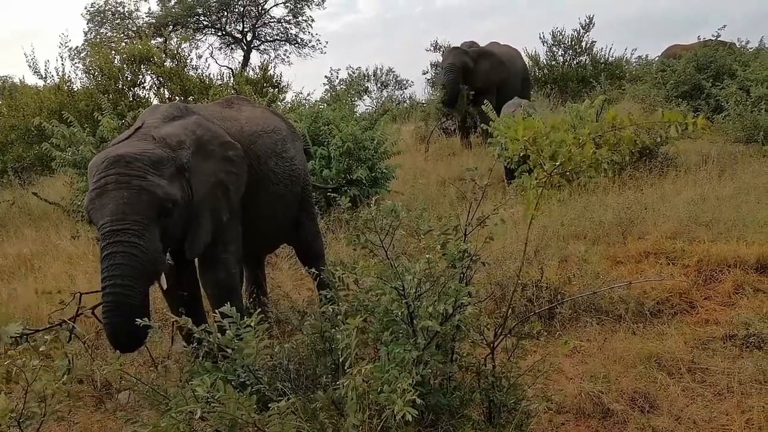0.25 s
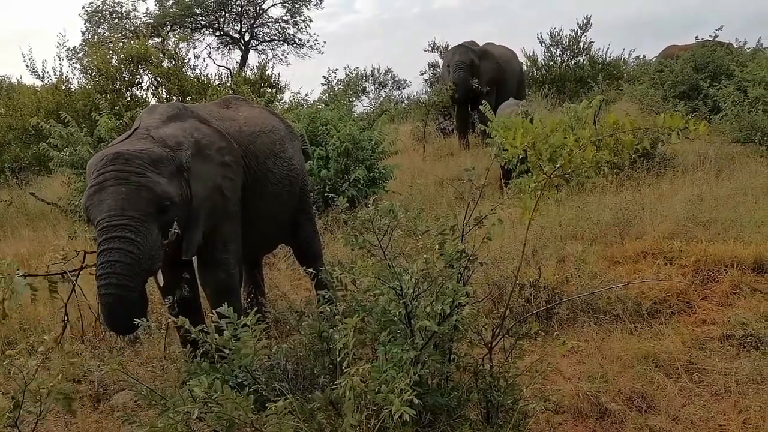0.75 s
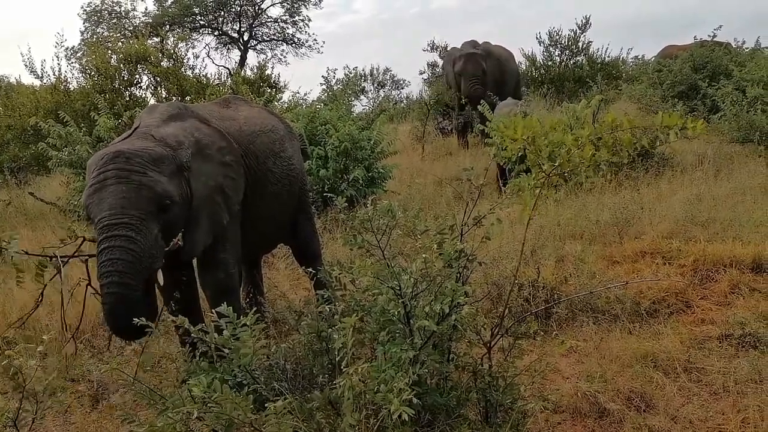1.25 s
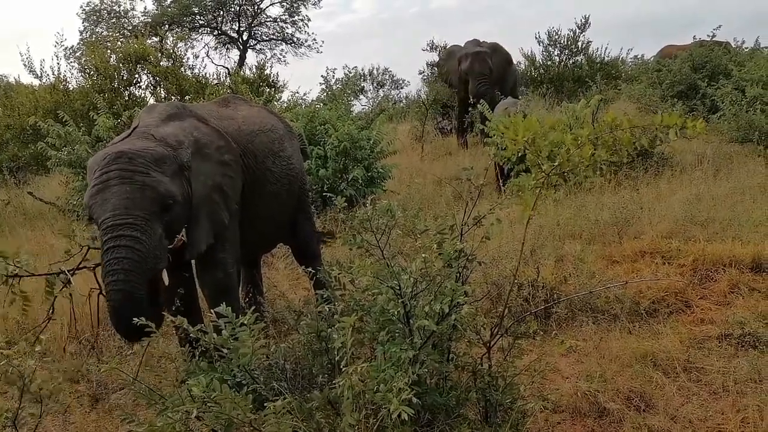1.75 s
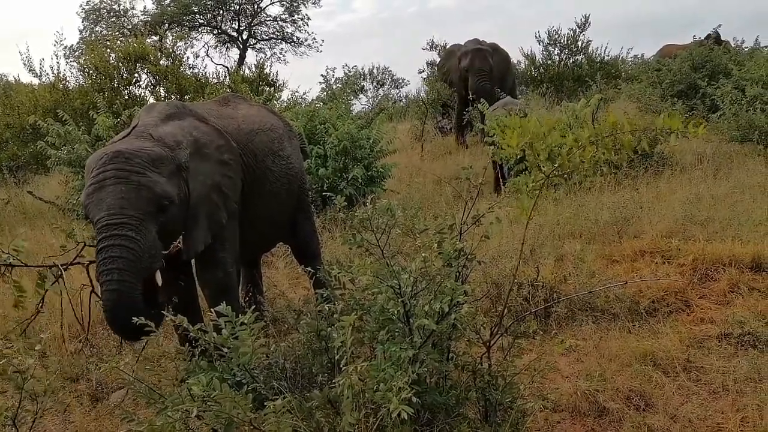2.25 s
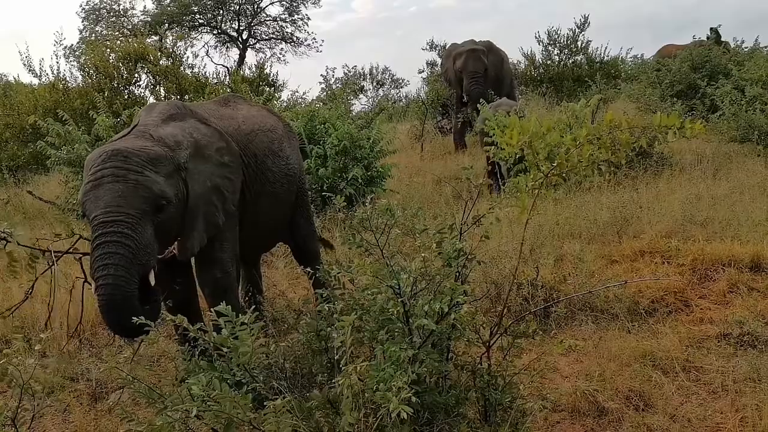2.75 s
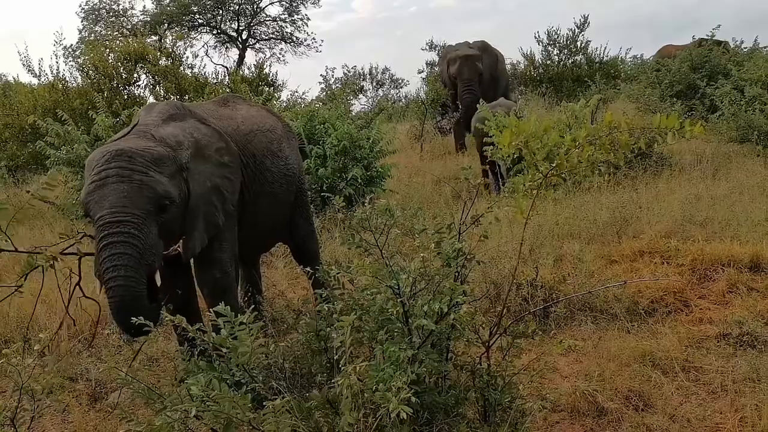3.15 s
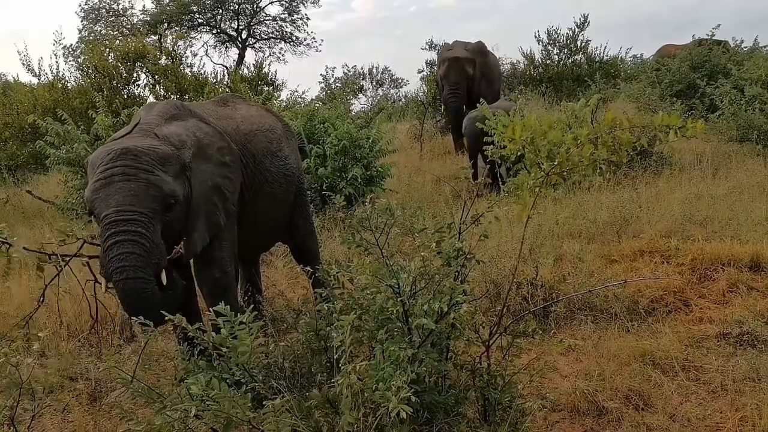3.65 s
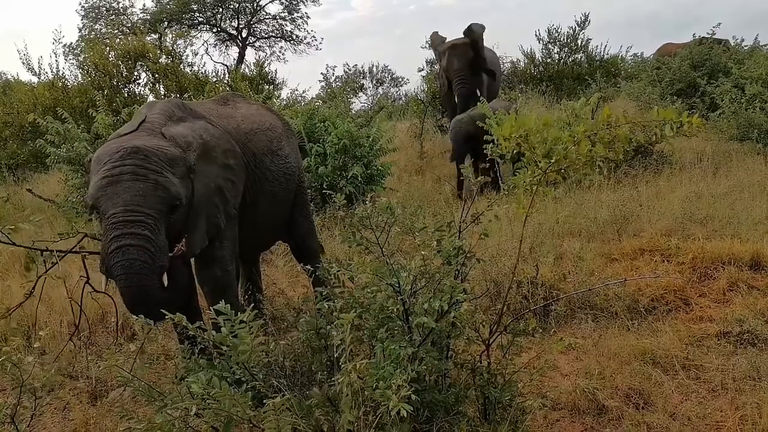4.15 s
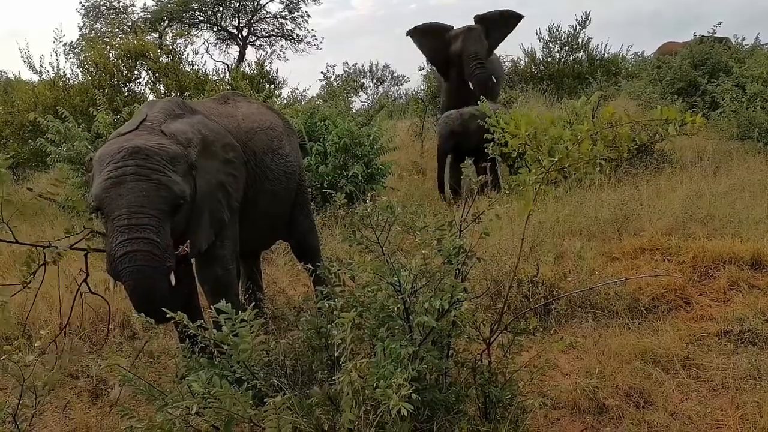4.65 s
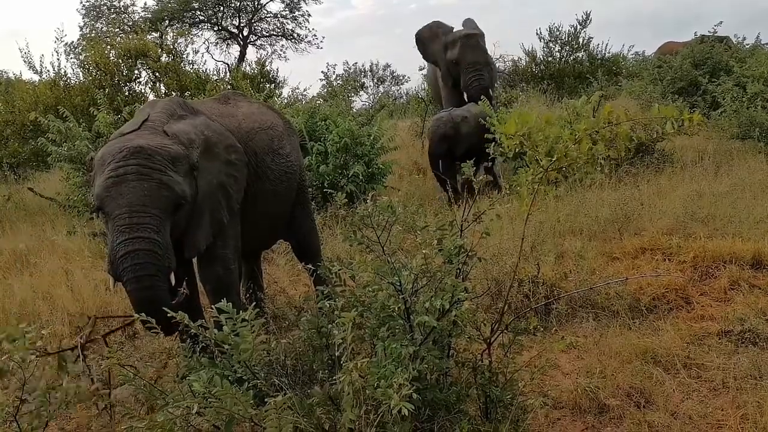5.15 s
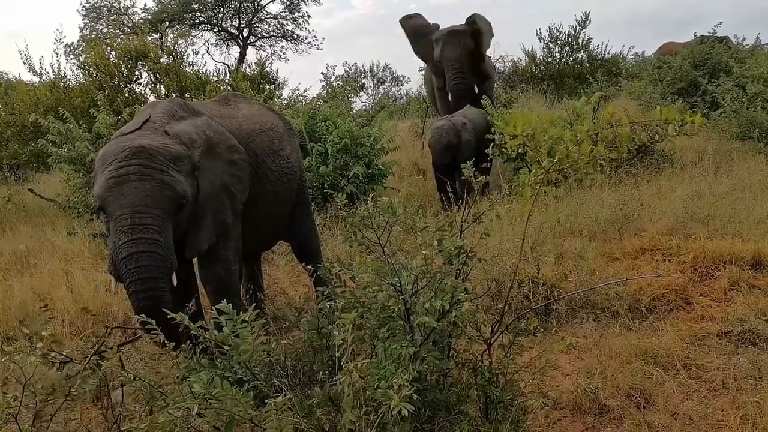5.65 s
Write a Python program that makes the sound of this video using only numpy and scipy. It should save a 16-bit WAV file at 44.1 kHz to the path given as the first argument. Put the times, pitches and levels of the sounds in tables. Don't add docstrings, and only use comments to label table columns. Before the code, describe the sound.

Dry leaves crackle and twigs break under feeding elephants, with wind thumps on the left, insects, low hum and a bird growing louder.

```python
import sys
import numpy as np
from scipy import signal
from scipy.fft import rfft, irfft
from scipy.io import wavfile

SR = 44100
rng = np.random.default_rng(int(sys.argv[2]) if len(sys.argv) > 2 else 0)


def inscribe(sig):
    pcm = np.round(np.clip(np.atleast_2d(sig).T, -1, 1) * 32767)
    wavfile.write(sys.argv[1], SR, pcm.astype(np.int16))


def makeup_ratio(level_db):
    decades = np.asarray(level_db, float) / 20
    return 10 ** decades


N = 260631
LEFT_LAG = -20


def rms_one(x):
    return x / np.sqrt(np.mean(x ** 2) + 1e-20)


def in_time(rows):
    s, *columns = np.transpose(rows)
    return [np.interp(np.arange(N) / SR, s, c) for c in columns]


def drift(rate):
    r = np.exp(-80 * np.pi * rate / SR)
    noise = rng.standard_normal(N // 40 + 2002)
    slow = signal.lfilter([1], [1, -2 * r, r * r], noise)[2000:]
    return np.interp(np.arange(N) / 40, np.arange(len(slow)), rms_one(slow))


def resonance(x, hz, width):
    r = np.exp(-np.pi * width / SR)
    top = [(1 - r * r) / 2, 0, (r * r - 1) / 2]
    bottom = [1, -2 * r * np.cos(2 * np.pi * hz / SR), r * r]
    return signal.lfilter(top, bottom, x + 1e-18)


def first_order(x, hz, kind):
    return signal.sosfilt(signal.butter(1, hz, kind, fs=SR, output="sos"), x)


def colour(x, points):
    hz = np.maximum(np.arange(2049) * SR / 4096, 1)
    point_hz, point_db = np.array(points).T
    response_db = np.interp(np.log(hz), np.log(point_hz), point_db)
    cepstrum = np.fft.irfft(np.log(makeup_ratio(response_db)))
    cepstrum[1:2048] *= 2
    cepstrum[2049:] = 0
    return signal.oaconvolve(x, irfft(np.exp(rfft(cepstrum))))[:N]


def add(track, s, sound):
    i = round(s * SR)
    track[i:i + len(sound)] += sound[:N - i]


def bush(x, scatter_db, t60, left_db=0.0, lag=LEFT_LAG, gap_s=0.0024):
    t = np.arange(9000) / SR
    scatter = rng.standard_normal((2, len(t))) * makeup_ratio(-60 * t / t60) * (t > gap_s)
    scatter = first_order(scatter, 700, "high")
    scatter = makeup_ratio(scatter_db) * scatter / np.linalg.norm(scatter[0])
    direct = np.array([makeup_ratio(left_db) * np.roll(x, lag), x])
    return direct + signal.oaconvolve(x[None], scatter, axes=1)[:, :N]


def spread(near, other, alike, lag):
    alike = np.clip(alike, 0, 1)
    left = alike * np.roll(near, round(lag)) + np.sqrt(1 - alike ** 2) * other
    return np.array([left, near])


def air():
    # f/Hz, level/dB per Hz
    air_tone = [(30, 30.5), (70, 30), (150, 13), (300, 18), (600, 7), (1000, 7.5), (1800, -16), (3000, 1),
                (6000, -8), (11600, 4), (12200, -8)]
    # f/Hz, width/Hz, first level/dB, last level/dB
    hum_bands = [(74.2, 7.7, -68.5, -62.5), (135, 16, -60, -63.5), (153.4, 28, -76.5, -61),
                 (233.4, 13.4, -79, -71.5)]
    # f/Hz, width/Hz, throbs/s, level/dB
    insects = [(7530, 150, 18, -67), (7360, 200, 20, -71), (4830, 500, 28, -75.5)]
    air_db = -67
    shared, *own = rng.standard_normal((3, N))
    own = np.array(own)
    bass = first_order(first_order(shared - own, 900, "low"), 60, "high")
    out = makeup_ratio(air_db + 0.52 * drift(0.33)) * np.array([colour(x, air_tone) for x in own + bass])
    for hz, width, *db in hum_bands:
        hum = resonance(resonance(shared + 0.7 * own, hz, width), hz, width)
        out += makeup_ratio(np.linspace(*db, N)) * rms_one(hum)
    for hz, width, per_s, db in insects:
        rate = per_s * makeup_ratio(0.5 * drift(3.8))
        throb = 1 + 0.062 * np.sin(2 * np.pi * np.cumsum(rate) / SR)
        level = makeup_ratio(db + 0.67 * drift(0.33))
        out += level * throb * rms_one(resonance(resonance(own, hz, width), hz, width))
    return out


def wind():
    # t/s, level/dB
    wind_level = [(0.0, -63), (0.57, -56), (0.67, -48.5), (0.84, -59.5), (1.3, -62.5), (1.55, -68.5),
                  (1.99, -52), (2.1, -62.5), (2.75, -74), (3.08, -60), (3.4, -61), (4.11, -64),
                  (4.3, -67.5), (4.56, -54.5), (4.91, -69.5), (5.23, -56.5), (5.55, -70.5), (5.91, -69.5)]
    # t/s, level/dB, fall time/ms
    buffets = [(0.03, -43, 4.5), (0.225, -45, 8.8), (1.079, -40, 3.6), (1.27, -45, 6.6), (1.47, -44, 4.4),
               (0.343, -41, 4.4), (0.614, -36.5, 6.7), (0.626, -32.5, 5.9), (0.643, -27, 3.54),
               (0.653, -32, 7), (0.666, -30, 2.8), (0.678, -43, 7.1), (0.686, -28, 3.1), (0.699, -42, 4.4),
               (0.704, -24.5, 2.42), (0.717, -37, 4.7), (0.744, -35.5, 3.6), (0.759, -40, 5.7),
               (0.793, -36.5, 3.9), (1.861, -38.5, 9.6), (1.891, -36, 3.9), (1.966, -36, 4.7),
               (3.111, -37, 6.5), (3.263, -37.5, 6.8), (3.697, -40.5, 3.1), (3.709, -27.5, 5.6),
               (3.721, -33, 3.8), (3.777, -32.5, 3.5), (4.368, -40, 4.5), (4.516, -38.5, 3.5),
               (4.563, -34.5, 3.2), (4.758, -40, 4.9), (5.142, -34.5, 5.3), (5.195, -41.5, 6.6),
               (5.23, -35.5, 5.4)]
    lumps = rng.standard_normal(N) * makeup_ratio(3.5 * drift(12))
    lumps = signal.sosfilt(signal.butter(2, [35, 120], "band", fs=SR, output="sos"), lumps)
    out = makeup_ratio(in_time(wind_level)[0] + 9.0) * rms_one(lumps)
    for s, db, fall_ms in buffets:
        u = np.arange(-0.03, 0.03, 1 / SR) / (fall_ms / 2000)
        add(out, s - 0.03, makeup_ratio(db + 7.5) * -u * np.exp(-u ** 2 / 2))
    return out


def far_calls():
    # start/s, length/s, first f/Hz, last f/Hz, level/dB
    calls = [(.335, .042, 2170, 2180, -50), (0, .05, 470, 480, -56), (.42, .075, 470, 460, -58),
             (.9, .018, 917, 900, -53), (1.003, .05, 352, 338, -56), (1.07, .125, 7400, 6980, -55),
             (1.268, .03, 3050, 2980, -54), (1.882, .095, 522, 480, -64), (2.11, .051, 1945, 1880, -63),
             (2.15, .044, 460, 395, -52), (2.4, .6, 133, 133, -57), (2.635, .05, 394, 388, -54),
             (2.645, .13, 7420, 7250, -54), (2.76, .09, 7200, 7000, -59), (2.465, .09, 6950, 6780, -58),
             (2.985, .16, 7120, 6960, -50), (3.375, .1, 3820, 3930, -59), (3.555, .09, 3870, 3930, -60),
             (3.665, .03, 3560, 3540, -63), (3.755, .055, 3910, 3800, -63), (3.8, .055, 3830, 3910, -61),
             (3.8, .068, 380, 389, -55), (3.96, .06, 3860, 3730, -60), (4.01, .07, 3730, 3840, -60),
             (4.47, .086, 7250, 7000, -60), (4.585, .033, 2760, 2800, -57), (4.8, .17, 7400, 6900, -59.5),
             (5.275, .04, 1600, 1570, -44), (5.28, .035, 1340, 1300, -47), (5.282, .034, 2290, 2320, -42)]
    out, waver_hz = np.zeros(N), 26 * drift(28)
    for s, length, first_hz, last_hz, db in calls:
        u = np.arange(0, length, 1 / SR) / length
        waver = np.sqrt(first_hz / 4000) * waver_hz[round(s * SR):][:len(u)]
        pitch = first_hz + (last_hz - first_hz) * u + waver
        add(out, s, makeup_ratio(db) * np.sin(np.pi * u) * np.sin(2 * np.pi * np.cumsum(pitch) / SR))
    return out * makeup_ratio(2.2 * drift(35) - 1.5)


def trill():
    # start/s, length/s, first f/Hz, last f/Hz, pulses/s
    s, length, first_hz, last_hz, per_s = (1.553, .28, 4350, 4720, 52.5)
    trill_db = -60.5
    t = np.arange(0, length, 1 / SR)
    pitch = first_hz + (last_hz - first_hz) * (t / length) ** 3
    pulses = np.sin(np.pi * per_s * t) ** 16
    out = np.zeros(N)
    add(out, s, makeup_ratio(trill_db) * pulses * np.sin(2 * np.pi * np.cumsum(pitch) / SR))
    return out


def near_bird():
    # start/s, length/s, middle f/Hz, peak level/dB
    notes_sung = [(0.915, 0.07, 2480, -63.5), (1.367, 0.076, 2530, -56.5), (1.46, 0.063, 2490, -65),
                  (1.816, 0.078, 2540, -58), (1.874, 0.052, 2515, -59), (2.232, 0.077, 2553, -48.5),
                  (2.345, 0.04, 2540, -61), (2.65, 0.076, 2543, -46), (2.761, 0.051, 2570, -54.5),
                  (3.075, 0.081, 2538, -43), (3.198, 0.046, 2550, -48.5), (3.492, 0.086, 2530, -44.5),
                  (3.612, 0.057, 2558, -47), (3.911, 0.091, 2530, -41.5), (4.032, 0.067, 2555, -43.5),
                  (4.351, 0.078, 2503, -42), (4.462, 0.061, 2500, -43), (4.768, 0.089, 2487, -39),
                  (4.894, 0.062, 2490, -40.5), (5.198, 0.089, 2535, -36.5), (5.324, 0.056, 2580, -42.5),
                  (5.609, 0.098, 2565, -39), (5.757, 0.056, 2506, -40.5)]
    note_shape = [(0, 0.082, 0.01), (.24, 0.055, 0.16), (.4, 0.0283, 0.75), (.65, -0.0063, 1.25),
                  (0.83, -.035, 1.2), (.92, -0.067, 0.64), (0.999, -0.11, 0.055)]
    share, shift, strength = np.transpose(note_shape)
    out = np.zeros(N)
    for s, length, hz, db in notes_sung:
        depth = np.clip(1.0 + 0.035 * (db + 40), 0.3, 1.02)
        u = np.arange(0, length, 1 / SR) / length
        pitch = hz * (1 + depth * np.interp(u, share, shift))
        whistle = np.sin(2 * np.pi * np.cumsum(pitch) / SR)
        add(out, s, makeup_ratio(db + 0.5) * np.interp(u, share, strength) * whistle)
    return out * makeup_ratio(1.5 * drift(60))


def ringing(rows, push_cycles, ring_cycles, lift_db):
    out, rough = np.zeros(N), rng.standard_normal((len(rows), 4000))
    for (s, hz, db), noise in zip(rows, rough):
        cycles = np.arange(4000) * hz / SR
        push = noise * np.sin(np.pi * np.minimum(cycles / push_cycles, 1))
        ring = resonance(resonance(push, hz, hz / ring_cycles), hz, 2 * hz / ring_cycles)
        start_s = s - np.argmax(abs(ring)) / SR
        add(out, max(start_s, 0), makeup_ratio(db + lift_db) * ring / abs(ring).max())
    return out


def quiet_leaf_snaps():
    # peak t/s, f/Hz, level/dB
    soft_snaps = [(0.687, 2890, -65), (0.707, 3448, -63), (0.894, 4877, -62), (0.914, 3072, -64),
                  (1.042, 2900, -66), (1.133, 2900, -68.4), (1.282, 3072, -55), (1.328, 3871, -63),
                  (1.329, 6870, -54), (1.348, 7307, -66.0), (1.537, 3255, -69.8), (1.95, 6510, -69.3),
                  (1.954, 2900, -70), (1.999, 4877, -63.2), (2.001, 2920, -62), (2.249, 3400, -67),
                  (2.438, 3470, -65), (2.579, 3448, -68), (2.607, 6230, -62), (2.794, 4877, -64),
                  (3.223, 6550, -61), (3.426, 5167, -59), (3.426, 6510, -56), (3.488, 3653, -65),
                  (3.627, 3950, -61), (3.681, 3470, -60.8), (4.021, 3871, -60), (4.041, 3670, -59),
                  (4.115, 2880, -63), (4.115, 4100, -64), (4.307, 4345, -62), (4.508, 3420, -61),
                  (4.603, 2880, -66), (4.673, 3430, -51), (4.963, 3850, -65), (4.967, 6930, -51),
                  (5.787, 4877, -45)]
    return ringing(soft_snaps, push_cycles=36, ring_cycles=22, lift_db=7.5)


def leaf_snaps():
    # peak t/s, f/Hz, level/dB
    snaps = [(0.022, 3370, -54), (0.044, 3330, -47), (0.045, 4877, -63), (0.045, 7600, -35),
             (0.076, 3480, -56), (0.094, 6510, -49), (0.096, 3700, -42.5), (0.111, 5160, -39),
             (0.116, 3653, -44), (0.116, 7400, -38), (0.135, 6460, -54.2), (0.197, 3448, -55),
             (0.197, 7500, -31.5), (0.227, 6850, -53.2), (0.228, 3255, -67), (0.229, 4877, -52),
             (0.349, 6510, -51), (0.357, 4850, -52), (0.369, 3050, -57.2), (0.419, 6870, -45),
             (0.42, 5120, -46), (0.439, 6897, -51.8), (0.453, 4960, -55.0), (0.458, 6840, -43),
             (5.14, 4300, -53), (5.168, 4345, -52), (5.17, 3300, -66), (5.178, 6460, -46),
             (5.209, 4560, -49), (5.212, 6100, -46), (5.233, 4300, -54.4), (5.236, 6560, -56.8),
             (5.272, 6897, -48), (5.274, 4310, -47), (5.295, 3800, -45), (5.33, 5000, -51),
             (5.349, 4900, -38), (5.379, 3610, -39.5), (5.391, 6050, -44), (5.367, 3370, -40),
             (5.423, 4890, -45), (5.441, 3290, -44), (5.446, 4830, -41), (5.465, 6200, -43),
             (5.468, 3214, -41), (5.486, 4877, -44), (5.5, 4900, -47), (5.503, 2510, -47),
             (5.516, 4877, -52), (5.523, 3240, -55), (5.55, 5167, -62), (5.384, 3800, -44),
             (5.573, 4870, -57), (5.601, 4870, -60), (5.609, 6570, -58), (5.616, 3653, -64),
             (5.63, 4603, -56), (5.654, 4877, -62)]
    return ringing(snaps, push_cycles=36, ring_cycles=22, lift_db=4.5)


def wood_knocks():
    # peak t/s, f/Hz, level/dB
    knocks = [(0.008, 450, -68), (0.044, 456, -56), (0.07, 475, -50), (0.07, 1120, -48.5),
              (0.086, 800, -46), (0.086, 1094, -59), (0.095, 1510, -52), (0.104, 807, -50.5),
              (0.12, 256, -54), (0.202, 340.7, -48), (0.205, 855, -53), (0.232, 776, -52),
              (0.247, 387, -48), (0.279, 340, -56), (0.313, 724, -54), (0.318, 1110, -52.5),
              (0.337, 689, -56), (0.34, 1032, -58), (0.346, 1480, -52), (0.367, 1030, -50),
              (5.295, 1570, -33), (5.327, 1547, -53), (5.348, 1530, -46), (5.35, 1228, -51),
              (5.374, 1600, -49), (5.391, 1320, -45), (5.392, 455, -54.7), (5.572, 897, -40),
              (5.432, 910, -52), (5.432, 1639, -46), (5.435, 273, -52), (5.436, 388, -50),
              (5.464, 293, -56), (5.48, 730, -55), (5.492, 1639, -52), (5.495, 1210, -45),
              (5.572, 1130, -42), (5.509, 354, -48), (5.515, 290, -50), (5.527, 1040, -52.0),
              (5.529, 725, -46.5), (5.535, 430, -40), (5.589, 684, -39), (5.596, 474, -40),
              (5.611, 360, -39.5), (5.615, 281, -48), (5.602, 1150, -42), (5.622, 830, -43),
              (5.624, 1146, -40.5), (5.641, 670, -48), (5.66, 386, -46), (5.662, 275, -54),
              (5.675, 1120, -55), (5.683, 494, -47), (5.729, 363, -45), (5.79, 650, -50),
              (5.79, 1100, -44.7), (5.866, 1030, -60)]
    return ringing(knocks, push_cycles=9, ring_cycles=9, lift_db=0.0)


def twigs():
    # t/s, peak level/dB, low mode f/Hz, low mode share/dB
    breaks = [(0.043, -29, 745, -21.5), (0.088, -32, 980, -13), (0.111, -27, 975, -24),
              (0.178, -29, 870, -28), (0.195, -31, 400, -36), (0.343, -33.5, 1030, -14.5),
              (0.455, -44, 470, -29), (0.919, -51, 850, 1), (0.998, -48, 490, -6), (2.518, -52, 483, -2.5),
              (2.641, -57, 574, 5.5), (3.893, -37.5, 610, -22), (4.149, -43, 820, -11.5),
              (4.205, -44.5, 750, -4.5), (4.334, -43, 800, -4), (4.508, -43, 610, -5),
              (4.671, -31.5, 1080, -15.5), (5.109, -50, 845, -14), (5.203, -40.5, 1220, -7.5),
              (5.27, -25.5, 1400, -19.5), (5.29, -35, 1360, -6), (5.43, -37, 412, -20),
              (5.505, -30.5, 496, -10), (5.785, -29, 1060, -11), (5.864, -37.5, 1060, -12)]
    t60_s, tear_ms = 0.028, 0.3
    out, t = np.zeros(N), np.arange(3000) / SR
    fibres = rng.standard_normal((len(breaks), len(t)))
    tearing = makeup_ratio(-60 * t / t60_s) * (1 - np.exp(-1000 * t / tear_ms))
    for (s, db, hz, thick_db), noise in zip(breaks, fibres):
        burst = noise * tearing + 5.0 * (t == 0)
        low = resonance(burst, hz, 0.32 * hz) - 0.45 * resonance(burst, 2.04 * hz, 0.8 * hz)
        high = resonance(burst, 3000, 1040) + 0.5 * resonance(burst, 6400, 3500)
        add(out, s, makeup_ratio(db - 2.0) * (high + makeup_ratio(thick_db + 18.5) * low))
    return out


def crackle(low_hz, high_hz, per_s, cycles, uneven_db, clump_db, patchy_db, count, tilt_db=0.0):
    draw, size, deal = rng.random((3, 2, N), dtype=np.float32)
    born = draw < per_s * makeup_ratio(clump_db * drift(18)) / SR
    sign = np.where(draw * 1e6 % 2 < 1, 1, -1)
    clicks = born * makeup_ratio(-uneven_db * np.log(size + 0.007)) * sign
    dealt = (deal * count).astype(int)
    out = 0
    for k, hz in enumerate(np.geomspace(low_hz, high_hz, num=count)):
        level = makeup_ratio(patchy_db * drift(11.0) + tilt_db * np.log2(hz / low_hz))
        out = out + level * resonance(clicks * (dealt == k), hz, 2.0 * hz / cycles)
    return rms_one(out)


def movements(rows, t, *steady_db):
    rise_share, fade_db = 0.64, 7.5
    power = makeup_ratio(np.array(steady_db)) ** 2
    for s, fade_s, *db in rows:
        away = np.where(t < s, (s - t) / rise_share, t - s) / max(fade_s, 0.004)
        power = power + makeup_ratio(np.array(db)[:, None] - fade_db * away) ** 2
    return in_time(np.transpose([t, *10 * np.log10(power)]))


def browsing():
    # t/s, effort as dry-leaf level/dB
    effort = [(0, -54.5), (0.3, -60.5), (0.54, -62), (0.9, -57.5), (1.07, -69), (1.51, -62.5),
              (1.83, -68.5), (2.19, -67.5), (2.4, -66.5), (2.63, -67), (2.9, -61.5), (3.24, -64),
              (3.6, -60), (3.75, -67), (4.46, -61), (4.6, -62.5), (5.12, -57), (5.91, -57.5)]
    # peak t/s, fading time/s, dry leaves/dB, brittle leaf tips/dB
    tugs = [(.05, 0.0053, -65, -57), (.093, 0.016, -47.5, -52), (.113, 0.017, -44.5, -57),
            (.2, 0.08, -51, -59.5), (.36, 0.072, -53, -63.5), (.45, 0.043, -52, -59.5),
            (.97, 0.13, -74, -73), (1.28, 0.052, -58.5, -88), (2.008, 0.018, -57, -83),
            (2.42, 0.15, -62, -74.5), (2.98, 0.012, -62, -70), (3.69, 0.083, -78, -68.5),
            (3.88, 0.15, -59, -69), (4.26, 0.18, -60, -63.5), (4.67, 0.056, -77, -75),
            (5.2, 0.068, -51, -69), (5.27, 0.022, -55, -87), (5.33, 0.038, -49.5, -87),
            (5.375, 0.11, -43.5, -82), (5.43, 0.052, -43.5, -55), (5.49, 0.03, -46, -55.5),
            (5.62, 0.036, -48.5, -70.5), (5.8, 0.018, -49.5, -69)]
    # peak t/s, fading time/s, heavy branch/dB, small stems/dB
    pulls = [(.01, 0.051, -57, -66), (.08, 0.032, -53.5, -58.5), (.2, 0.029, -50, -63.5),
             (.26, 0.025, -58, -84), (.34, 0.035, -81, -59), (.46, 0.011, -79, -65), (.71, 0.012, -68, -81),
             (1.02, 0.068, -60.5, -68), (1.51, 0.1, -60.5, -67), (2.63, 0.14, -58.5, -95),
             (3.83, 0.11, -69, -71), (4.2, 0.057, -56, -77), (4.67, 0.011, -53, -59),
             (5.2, 0.055, -58, -60), (5.27, 0.037, -76, -65), (5.33, 0.051, -56, -53.5),
             (5.41, 0.056, -52, -57), (5.43, 0.01, -41, -59), (5.5, 0.015, -53, -52),
             (5.54, 0.091, -41, -73), (5.6, 0.029, -46, -53), (5.67, 0.051, -45, -80),
             (5.74, 0.039, -53, -76), (5.8, 0.011, -45, -73), (5.86, 0.055, -51.5, -61)]
    # f/Hz, width/Hz, level/dB, extra dB per dB of effort
    pods = [(2195, 260, 13, 0.86), (3310, 110, 11, 2), (4880, 200, 9, 1), (5950, 200, 9, 1.5),
            (7140, 57, 3, 0.5)]
    t = np.arange(0, N / SR + 0.002, 0.002)
    effort_db = np.interp(t, *np.transpose(effort))
    swing_db = effort_db + 60
    leaves_db, tips_db = movements(tugs, t, effort_db, -76.5 + swing_db)
    branch_db, stems_db = movements(pulls, t, -66.5 + 0.15 * swing_db, -72 + 0.37 * swing_db)

    grains = crackle(2464, 9070, 6000, 12.8, 2.8, 2.5, 2.4, count=13)
    leaves = grains
    for hz, width, db, grip in pods:
        pod_db = db + grip * (leaves_db + 39.5) + 3.6 * drift(26.0)
        leaves = leaves + makeup_ratio(pod_db) * resonance(grains, hz, width)
    tips = crackle(7360, 9650, 14000, 15.4, 0.99, 3.1, 0.35, count=5)
    stems = crackle(792, 2080, 2000, 19.0, 1.9, 2.5, 2.8, count=7)
    branch = crackle(250.3, 1250, 1500, 12.0, 1.96, 2.5, 3.0, count=10, tilt_db=-7.5)

    out = makeup_ratio(leaves_db + 2.5) * spread(*leaves, 0.43, LEFT_LAG)
    out += makeup_ratio(tips_db + 20.0) * spread(*tips, 0.28, LEFT_LAG)
    out += makeup_ratio(stems_db + 5.5) * spread(*stems, 0.75, 5.67)
    out += makeup_ratio(branch_db - 3.5) * spread(*branch, 0.83, -2)
    return out


def scene():
    # f/Hz, level/dB
    right_port = [(30, 1), (1500, -2), (2900, -3), (3500, 2), (4200, 1.5), (4850, 2), (5500, -4),
                  (6200, 0.5), (7500, -6.5), (7900, -13), (9100, -12), (9500, -19), (11700, -10.5),
                  (13200, -18)]
    left_port = [(30, -3), (600, 0), (1500, -5), (3300, -7.5), (4600, -10), (5100, -5), (5600, -33),
                 (6600, -8.5), (7600, -27), (8700, -20), (9400, -17.5), (10700, -11), (11700, -6),
                 (13200, -12.5)]
    far = bush(far_calls(), scatter_db=-7.0, t60=0.15, left_db=-0.5, lag=3)
    far += bush(trill(), scatter_db=-12.0, t60=0.05, left_db=6.0)
    near = bush(near_bird(), scatter_db=-10.5, t60=0.29, left_db=-11.0, gap_s=0.0137)
    breaking = twigs() + wood_knocks() + leaf_snaps()
    herd = browsing() + bush(breaking, scatter_db=-1.0, t60=0.11, lag=2.5)
    left, right = air() + far + near + herd
    soft_snaps = quiet_leaf_snaps()
    left = left + makeup_ratio(-4.0) * np.roll(soft_snaps, LEFT_LAG)
    right = right + soft_snaps
    gusts = wind()
    return np.array([colour(left, left_port) + gusts, colour(right, right_port) + makeup_ratio(-28) * gusts])


def roll_off(x):
    return signal.sosfilt(signal.butter(12, 13500, fs=SR, output="sos"), x)


def record(dry):
    return roll_off(dry)


dry = scene()
out = record(dry)
inscribe(out)
```